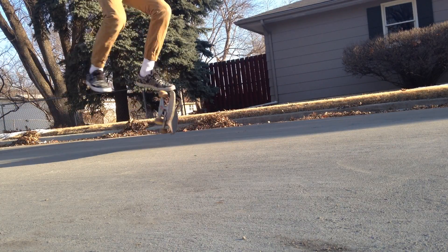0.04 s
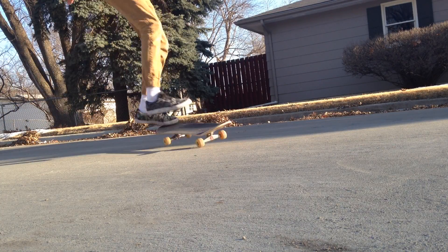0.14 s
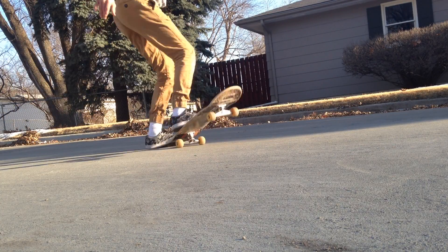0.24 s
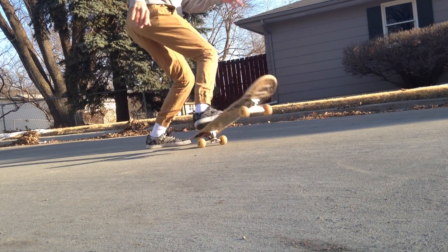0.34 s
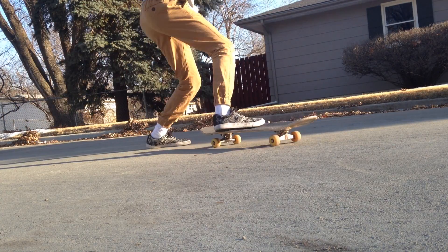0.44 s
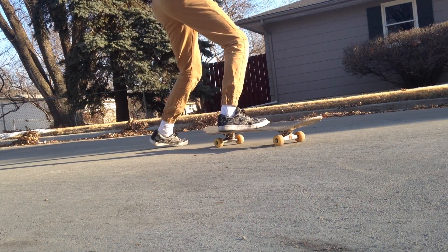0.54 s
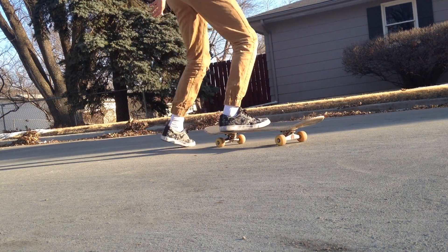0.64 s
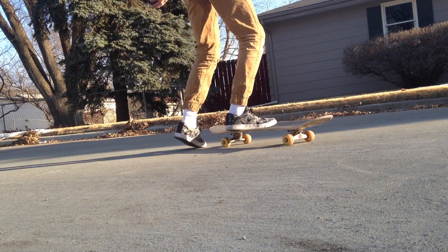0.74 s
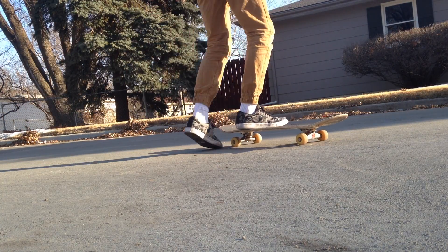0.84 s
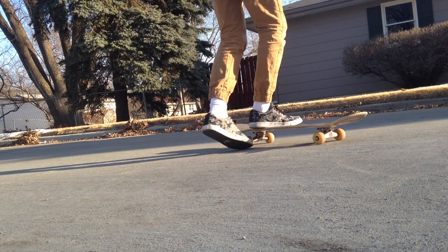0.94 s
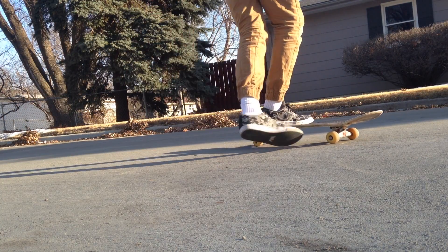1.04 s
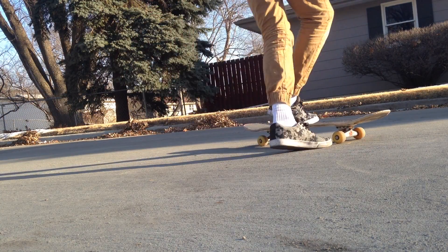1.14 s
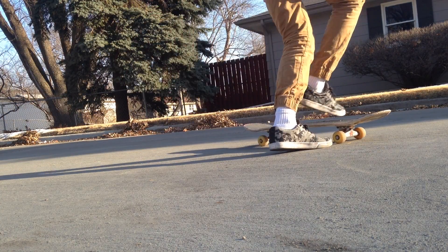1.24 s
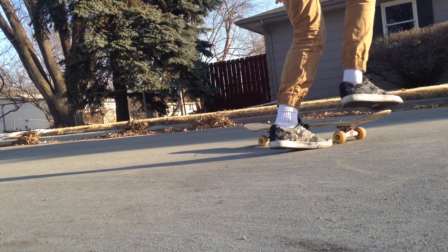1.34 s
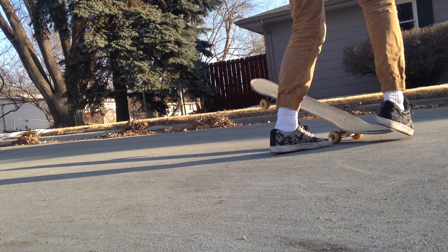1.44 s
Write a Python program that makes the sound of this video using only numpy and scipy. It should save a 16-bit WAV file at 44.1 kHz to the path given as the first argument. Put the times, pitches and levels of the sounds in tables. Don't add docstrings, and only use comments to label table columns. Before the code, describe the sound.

A skateboard lands badly on asphalt, clacking and slapping hard, then a shoe scuffs and steps

```python
import sys
import numpy as np
from scipy import signal
from scipy.fft import rfft, irfft, next_fast_len
from scipy.io import wavfile
from scipy.ndimage import map_coordinates

SR = 44100
rng = np.random.default_rng(int(sys.argv[2]) if len(sys.argv) > 2 else 0)


def master(y):
    cut = np.clip(np.atleast_2d(y).T, -1, 1)
    pcm = np.round(cut * 32767)
    wavfile.write(sys.argv[1], SR, pcm.astype(np.int16))


def gain_from_decibels(decibels):
    exponent = np.asarray(decibels, float) / 20
    return 10 ** exponent


N = 66150

# (frequency [Hz], level [dB], t60 [s])
DECK_MODES = [(209.3, -3, 0.058), (328.2, 0.5, 0.068), (427.3, -4.5, 0.048), (500, -5.5, 0.047),
              (647.5, -8.5, 0.048), (800, 1.5, 0.015), (964, -6.5, 0.07), (1050, -4, 0.038),
              (1312, -4.5, 0.039), (1485, -7, 0.046), (1728, -8.5, 0.077), (1904, -6, 0.041),
              (2300, -17, 0.071)]
# (frequency [Hz], level [dB])
SOLE_SPECTRUM = [(1000, -11), (2500, 5.5), (5000, -2), (9000, -5.5), (13000, -12.5), (16000, -18.5)]


def unit(x):
    return x / np.sqrt(np.mean(x ** 2) + 1e-20)


def along(points, hz):
    f, v = np.transpose(points)
    return np.interp(np.log(hz + 1), np.log(f + 1), v)


def wobble(rate, n):
    return map_coordinates(rng.standard_normal(n // 8 + 8), [np.arange(n) * rate / SR])


def filtered(x, response):
    m = next_fast_len(len(x) + 4096)
    return irfft(rfft(x, m) * response(np.fft.rfftfreq(m, 1 / SR)), m)[:len(x)]


def add(track, s, sound):
    i = max(round(s * SR), 0)
    track[i:i + len(sound)] += sound[:len(track) - i]


def near(hz, centre_hz, octaves):
    return np.exp(-0.5 * (np.log2((hz + 1) / centre_hz) / octaves) ** 2)


def body(modes, longer):
    def response(f):
        total = 0
        for k, (hz, db, t60) in enumerate(modes):
            bandwidth = 2.35 / (t60 * longer)
            total = total + gain_from_decibels(db) * (-1) ** k * 1j * f / (hz * hz - f * f + 1j * f * bandwidth)
        return total
    return response


def stroke(length, rise, n):
    u = np.clip(np.arange(n) / SR / length, 0, 1)
    rise = np.clip(rise, 0.03, 0.97)
    faster = np.sin(np.pi / 2 * np.minimum(u / rise, 1))
    slower = np.cos(np.pi / 2 * np.clip((u - rise) / (1 - rise), 0, 1))
    return faster * slower


def struck(modes, longer, contact_s, t):
    detune, scatter_db = 0.021, 1.5
    varied = []
    for (hz, db, t60), (a, b) in zip(modes, rng.standard_normal((len(modes), 2))):
        varied.append((hz * (1 + detune * a), db + scatter_db * b, t60))
    force = rng.standard_normal(len(t)) * np.exp(-t / contact_s)
    ring = filtered(force, body(varied, longer))
    return ring / np.abs(ring).max()


def street():
    # (frequency [Hz], level [dB])
    far_spectrum = [(15, -48), (25, -18), (136, -2), (274, -12), (421, -14.5), (508, -13), (740, -15),
                    (893, -18), (15400, -58)]
    # (time [s], level [dB])
    swell = [(0, 6.5), (.19, 8), (.3, 6.5), (.5, -5.5), (.9, 1.5), (1.149, 2), (1.5, 2.5)]
    level_db = -48 + np.interp(np.arange(N) / SR, *np.transpose(swell)) + 1.3 * wobble(11.73, N)
    return gain_from_decibels(level_db) * unit(filtered(rng.standard_normal(N), lambda f: gain_from_decibels(along(far_spectrum, f))))


def walls(x):
    # (frequency [Hz], t60 [s])
    wall_decay = [(200, 0.69), (1500, 0.77), (8000, 0.082)]
    delay_s = 0.015
    hz, t, z = signal.stft(rng.standard_normal(SR // 2), SR, nperseg=256)
    tail = signal.istft(z * gain_from_decibels(-60 * t / along(wall_decay, hz)[:, None]), SR, nperseg=256)[1]
    delayed = np.pad(x, (round(delay_s * SR), 0))
    return signal.fftconvolve(delayed, tail / np.linalg.norm(tail))[:N]


def drag():
    # (time [s], level [dB], resonance of the hollow under the sole [Hz])
    path = [
        (.66, -61, 3180),
        (0.709, -50.5, 3400),
        (.77, -46.5, 3330),
        (0.827, -41.5, 4930),
        (.9, -44.5, 5650),
        (.95, -53.5, 5600),
        (.97, -80, 5600),
    ]
    s, db, hollow_hz = np.transpose(path)
    hz, t, z = signal.stft(rng.standard_normal(N), SR, nperseg=256)
    hz = hz[:, None]
    centre = np.interp(t, s, hollow_hz)

    def resonance(c):
        return 1 / (1 + (7 * (hz - c) / c) ** 2)

    colour_db = along(SOLE_SPECTRUM, hz) + 5.5 * np.log2(hz / 4000 + 1)
    colour_db = colour_db + 8 * resonance(centre) + 4.5 * resonance(1.7 * centre)
    hiss = signal.istft(z * gain_from_decibels(colour_db), nperseg=256)[1][:N]
    return unit(hiss) * gain_from_decibels(np.interp(np.arange(N) / SR, s, db, -120, -120) + 1.5 * wobble(240, N))


def scuffs():
    # (start [s], length [s], level [dB], lowest frequency [Hz], rising share)
    slides = [(0, 0.1, -48, 2440, .1), (0.05, 0.66, -55.5, 2000, 0.15), (0.234, 0.1, -36.5, 3000, 0.13),
              (0.3, 0.044, -34, 2010, .9), (0.313, 0.018, -32.5, 2480, 0.34), (0.341, 0.056, -47, 2954, .1),
              (0.385, 0.062, -50.5, 3000, 1), (0.516, 0.045, -39, 2900, 0.087),
              (0.556, 0.097, -51, 3000, 0.31), (0.594, 0.079, -48.5, 4930, 0.56),
              (0.939, 0.055, -48, 4650, 0.52), (0.996, 0.019, -44.5, 4260, 0.78),
              (1.01, 0.035, -56, 4030, 0.79), (1.065, 0.12, -54, 3070, 0.76),
              (1.444, 0.0083, -42, 3600, 0.46), (1.475, .025, -54.5, 2990, 0.7),
              (1.493, .009, -43.5, 3200, .3)]
    out, n = np.zeros(N), SR // 5
    for s, length, db, low_hz, rise in slides:
        noise = rng.standard_normal(n)
        hiss = unit(filtered(noise, lambda f: gain_from_decibels(along(SOLE_SPECTRUM, f)) / np.sqrt(1 + (low_hz / (f + 1)) ** 12)))
        lumps_db = 2.5 * wobble(140, n) + 0.75 * wobble(110, n)
        add(out, s, gain_from_decibels(db + lumps_db) * hiss * stroke(length, rise, n))
    return out


def grit():
    # (time [s], level [dB])
    snaps = [(0.293, -26), (0.367, -34), (0.4755, -33.5), (.56, -33), (.565, -32), (.586, -31), (.591, -42),
             (0.5972, -32.5), (.6, -43), (.618, -32), (.622, -31), (.982, -40), (.9905, -39.5),
             (.9938, -32.5), (.9948, -28), (.9958, -30), (.9998, -31), (1.0008, -35), (1.003, -40),
             (1.0052, -36), (1.0074, -24.5), (1.0095, -37.5), (1.0106, -31), (1.018, -46), (1.0225, -45),
             (1.0285, -43), (1.0315, -42), (1.038, -47), (1.043, -41.5)]
    # (time [s], level [dB])
    dull_snaps = [
        (1.0808, -43),
        (1.0808, -43),
        (1.0866, -42.5),
        (1.1122, -37.5),
        (1.129, -36.5),
        (1.1437, -37),
                  (0.6392, -36.5),
        (0.6474, -36),
        (0.6554, -38),
        (1.27, -50),
        (1.2764, -50),
    ]
    grains = [(s, db, 4490, SR) for s, db in snaps]
    grains += [(s, db - 3, 3000, 8000) for s, db in dull_snaps]
    out, t = np.zeros(N), np.arange(400) / SR
    for s, db, low_hz, top_hz in grains:
        def colour(f):
            high_pass = f ** 4 / (f ** 4 + float(low_hz) ** 4)
            return gain_from_decibels(along(SOLE_SPECTRUM, f)) * high_pass / (1 + (f / top_hz) ** 4)
        burst = unit(filtered(rng.standard_normal(400), colour))
        add(out, s, gain_from_decibels(db - 60 * t / 0.0035) * burst)
    return out


def rubs():
    # (start [s], length [s], level [dB], centre frequency [Hz], spread [octaves])
    strokes = [(0, 0.047, -35.5, 920, 1.23), (0.041, 0.066, -29, 1140, 1.02),
               (0.102, 0.47, -50.5, 990, 0.6), (0.238, 0.092, -26, 452, 1.5), (0.338, 0.11, -28.5, 367, .8),
               (.33, 0.1, -41, 1200, 1), (0.438, 0.052, -28.5, 916, 0.56), (0.52, 0.05, -34, 544, 1.08),
               (0.637, 0.039, -42.5, 930, 0.7), (0.896, 0.2, -50.5, 325, 1.23),
               (0.737, 0.19, -48, 1120, 0.88)]
    out, n = np.zeros(N), SR // 3
    for s, length, db, hz, octaves in strokes:
        bumps_db = 3.5 * wobble(770, n) + 2.7 * wobble(94.3, n)
        push = rng.standard_normal(n) * gain_from_decibels(bumps_db) * stroke(length, 0.11, n)
        sound = filtered(push, lambda f: body(DECK_MODES, 0.8)(f) * near(f, hz, octaves))
        add(out, s, gain_from_decibels(db) * unit(sound) * np.sqrt(length * SR / n))
    return out


def taps():
    # (time [s], level [dB], frequency [Hz],
    # t60 [s])
    damped_tones = [(.045, -18.5, 1220, 0.0086), (0.051, -16.5, 1550, 0.013), (0.0543, -21, 1060, 0.014),
                    (0.0575, -14, 1410, 0.0064), (.0635, -17, 900, 0.0044), (0.072, -22.5, 1478, 0.028),
                    (0.0864, -21, 1500, 0.013), (0.197, -20.5, 320, .013), (0.2036, -4, 334, 0.052),
                    (.204, -6.5, 773, 0.027), (0.2057, -6, 970, 0.033), (.209, -5, 456.5, 0.024),
                    (0.2208, 0.5, 3500, 0.0042), (0.2356, -3.5, 504, 0.018), (0.2361, -8.5, 970, 0.012),
                    (.2665, -23, 3570, 0.013), (.279, -19.5, 290, .016), (0.3242, -21, 4140, 0.0034),
                    (0.3234, -16.5, 3400, 0.006), (0.3265, -14, 2910, 0.0043), (0.329, -6.5, 2130, 0.0021),
                    (.33, -5.5, 1340, 0.0049), (.3325, -15.5, 920, 0.014), (.351, -15.5, 295, .025),
                    (.36, -24, 496.6, 0.023), (0.37, -18.5, 352, .02), (0.446, -30, 925.9, .03),
                    (.449, -20, 450, .014), (0.4529, -15.5, 151, 0.036), (.454, -16, 328, 0.072),
                    (0.4537, -8, 4100, 0.0067), (.4545, -12.5, 1700, 0.054), (.455, -2, 917, .015),
                    (.4555, -15.5, 1300, 0.044), (.456, -13, 629, 0.045), (.5225, -20, 753, 0.025),
                    (.9955, -27, 602, 0.0052), (1.1596, -17, 470, 0.0056), (1.162, -19, 458, 0.0042),
                    (1.179, -22.5, 900, 0.0027), (1.4192, -18, 519, 0.045), (1.419, -14, 4240, 0.0046),
                    (1.4195, -24, 800, 0.02), (1.42, -18, 160, 0.05), (1.4225, -26.5, 820, 0.033),
                    (1.43, -29.5, 1267, 0.017), (1.4958, -32, 4650, .006)]
    out, t = np.zeros(N), np.arange(SR // 10) / SR
    rise = 1 - np.exp(-t / 0.00021)
    for s, db, hz, t60 in damped_tones:
        add(out, s, gain_from_decibels(db + 6 - 60 * t / t60) * rise * np.sin(2 * np.pi * hz * t))
    return out


def trucks():
    # (frequency [Hz], level [dB], t60 [s])
    metal_modes = [(2600, -10, .008), (3050, -3, .012), (3558, 0, .015), (4300, -6, .01), (5300, -11, .006),
                   (7800, -14, .003)]
    # (time [s], level [dB], ring length [x])
    clacks = [(0.206, 0, 0.96), (0.2165, -14.5, 0.12), (0.2352, -18, 0.18), (.262, -19, .3),
              (0.267, -15.5, 1), (0.284, -30, 0.25), (0.3226, -9.5, 0.21), (0.3268, -6, 0.23),
              (0.336, -28, 0.15), (0.3413, -27.5, 0.095), (.454, -7, 0.88), (0.462, -13, 0.24),
              (1.4221, -28.5, .2), (1.495, -35, 0.22)]
    out, t = np.zeros(N), np.arange(SR // 10) / SR
    for s, db, longer in clacks:
        add(out, s, gain_from_decibels(db) * struck(metal_modes, longer, 0.0013, t))
    return out


def deck():
    # (time [s], level [dB], strongest ringing [Hz], ring length [x], crack level [dB])
    blows = [(0, -17.5, 800, 0.92, -33.5), (0.2027, 1, 500, 1, 0.5), (0.2061, 1.5, 518, 0.8, -4),
             (0.2349, 3.5, 650, 0.51, -7.5), (.266, -9, 970, 0.41, -31), (0.328, -13, 1050, 1, -21.5),
             (.453, 3.5, 860, 0.48, -3.5), (.518, -10, 930, 0.56, -18.5), (1.4189, -16.5, 928, 0.94, -16.5),
             (1.424, -28, 1500, 0.42, -34.5), (1.4289, -32, 1350, 0.18, -38),
             (1.444, -38, 1620, 0.46, -38.5)]
    # (frequency [Hz], level [dB])
    crack_spectrum = [(800, -1), (2000, -4), (4000, -6), (8000, -6), (12000, -14), (16000, -34)]
    contact_s, spread_octaves = 0.0057, 1
    out, t = np.zeros(N), np.arange(SR // 5) / SR
    envelope = (1 - np.exp(-t / 0.00032)) * (gain_from_decibels(-60 * t / 0.0077) + gain_from_decibels(-7.5 - 60 * t / 0.051))
    for s, db, hz, longer, crack_db in blows:
        modes = [(f, level + 20 * np.log10(near(f, hz, spread_octaves)), t60) for f, level, t60 in DECK_MODES]
        dull_hz = 19000 * np.exp(0.052 * crack_db)
        noise = rng.standard_normal(len(t))
        noise = unit(filtered(noise, lambda f: gain_from_decibels(along(crack_spectrum, f)) / (0.5 + (f / dull_hz) ** 4)))
        add(out, s, gain_from_decibels(db) * struck(modes, longer, contact_s, t) + gain_from_decibels(crack_db) * noise * envelope)
    return out


def scene():
    board = deck() + taps() + trucks() + grit() + rubs() + scuffs() + drag()
    board = filtered(board, lambda f: (1j * f / (114 + 1j * f)) ** 3)
    echo = gain_from_decibels(-31.5) * walls(board)
    hiss = gain_from_decibels(-62.5) * rng.standard_normal(N)
    return (board + echo + street() + hiss)[None]


def roll_off(x):
    return signal.sosfilt(signal.butter(12, 15600, fs=SR, output="sos"), x)


def record(dry):
    top_hz, port_hz, port_octaves, port_gain = 15600, 3150, 0.01, 0.3
    ceiling, knee = 0.99, 30
    x = filtered(dry[0], lambda f: (f < top_hz) * (1 + port_gain * near(f, port_hz, port_octaves)))
    x = x / (1 + np.abs(x / ceiling) ** knee) ** (1 / knee)
    return roll_off(x[None])


dry = scene()
out = record(dry)
master(out)
```